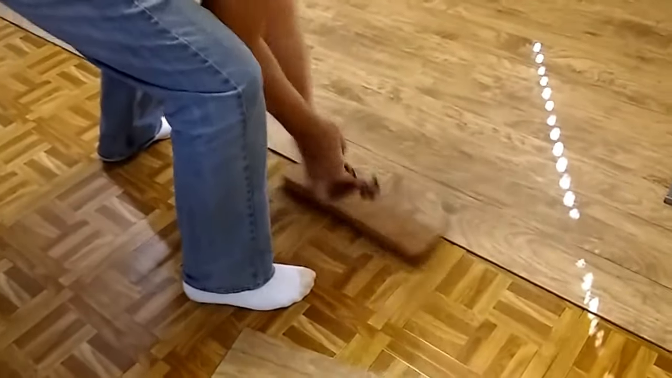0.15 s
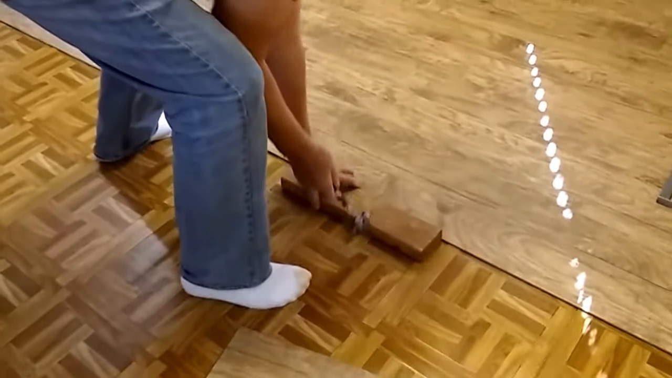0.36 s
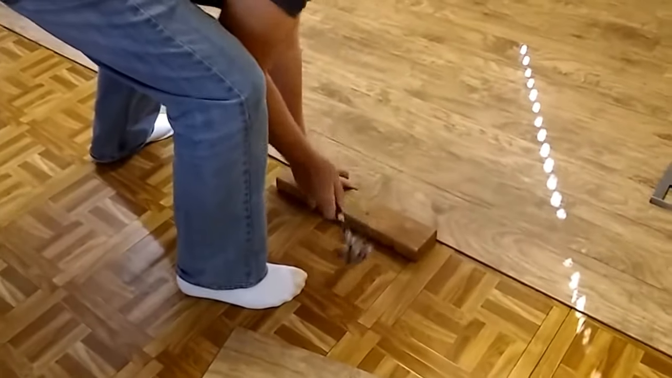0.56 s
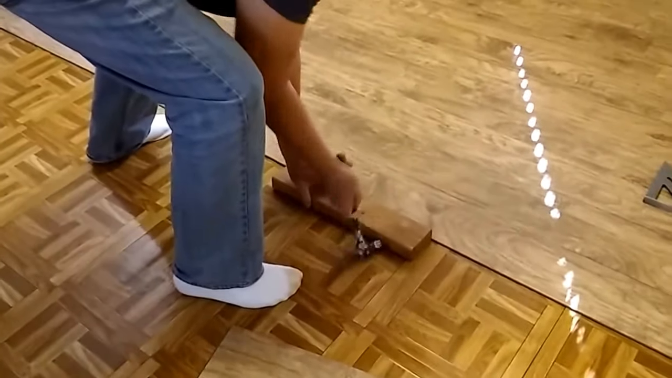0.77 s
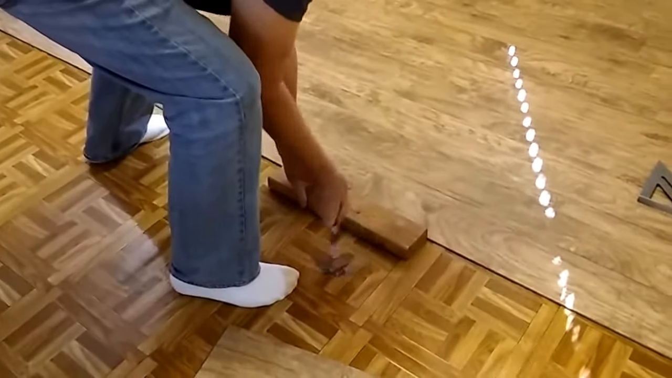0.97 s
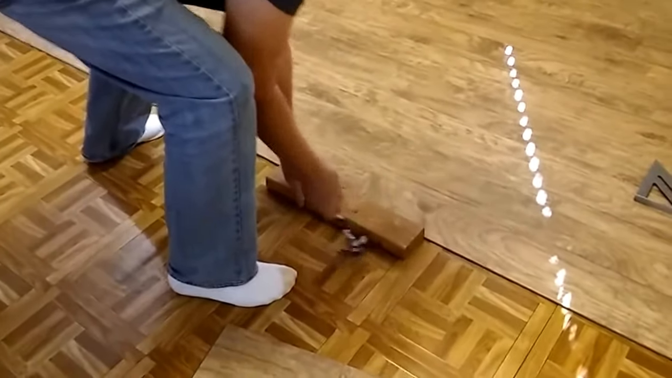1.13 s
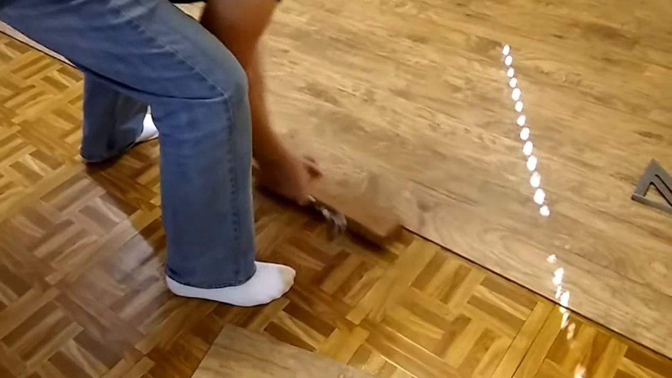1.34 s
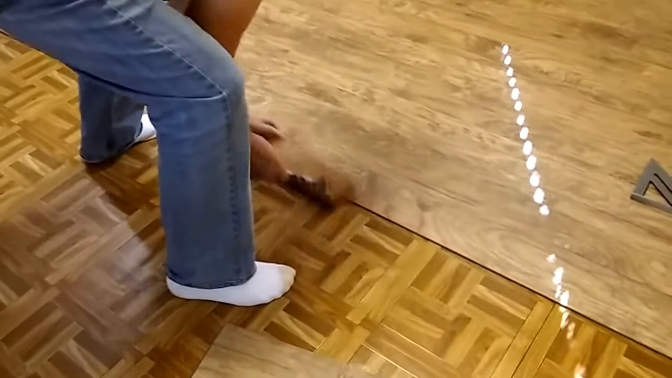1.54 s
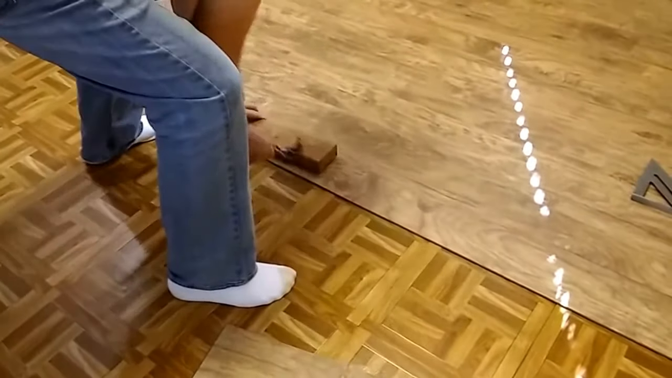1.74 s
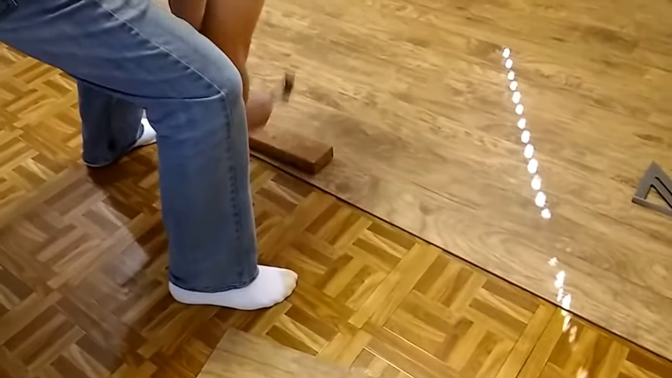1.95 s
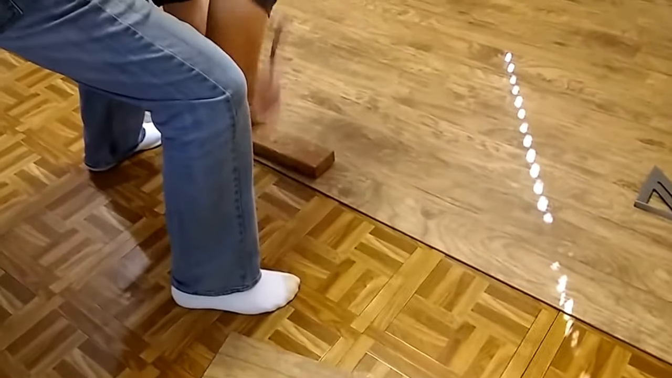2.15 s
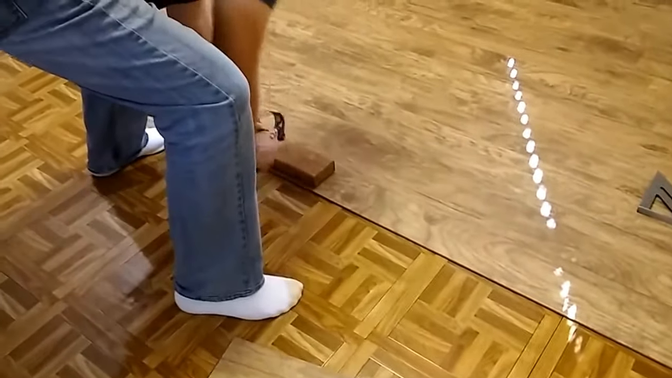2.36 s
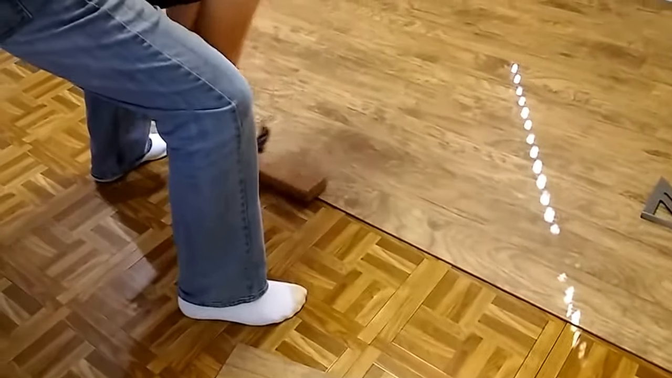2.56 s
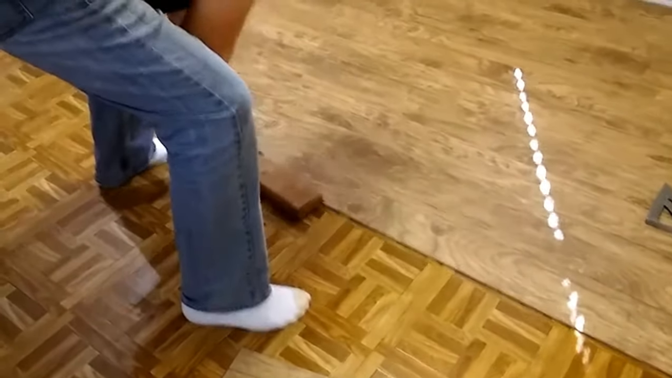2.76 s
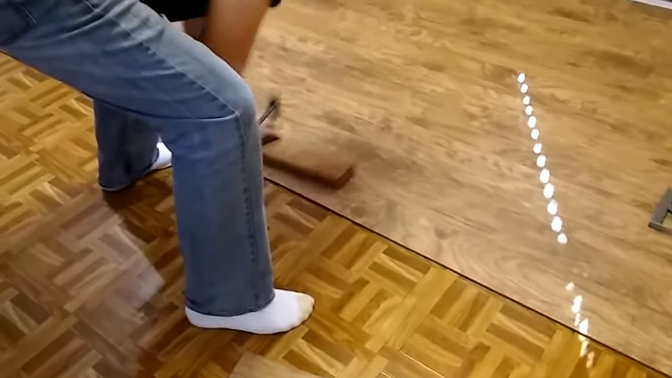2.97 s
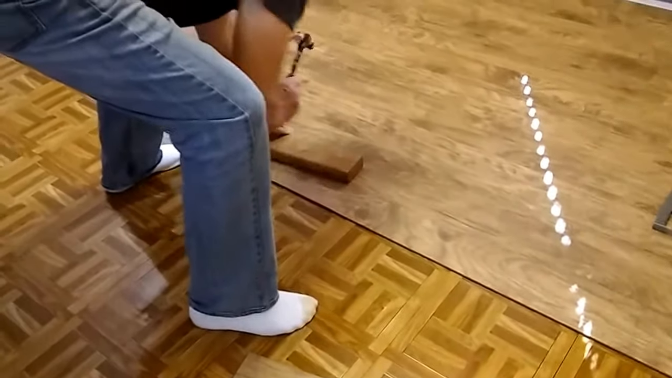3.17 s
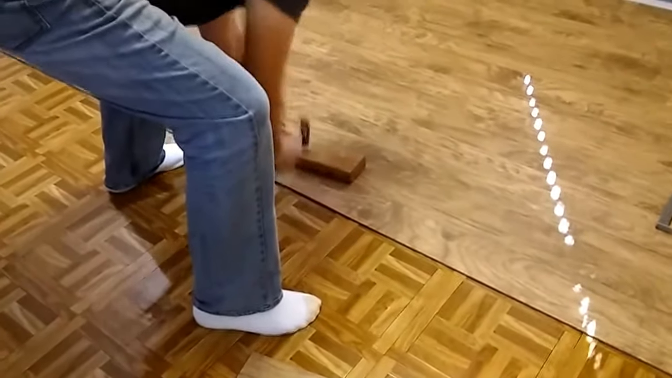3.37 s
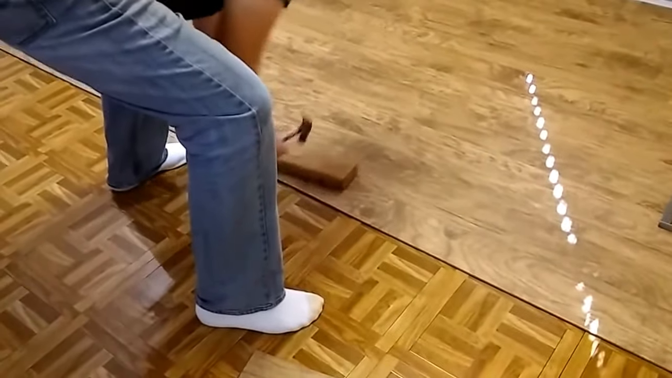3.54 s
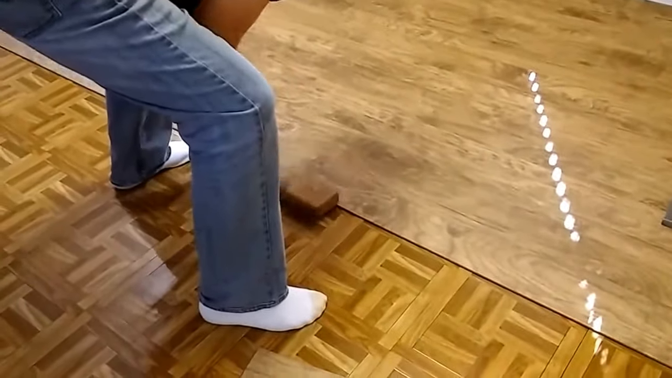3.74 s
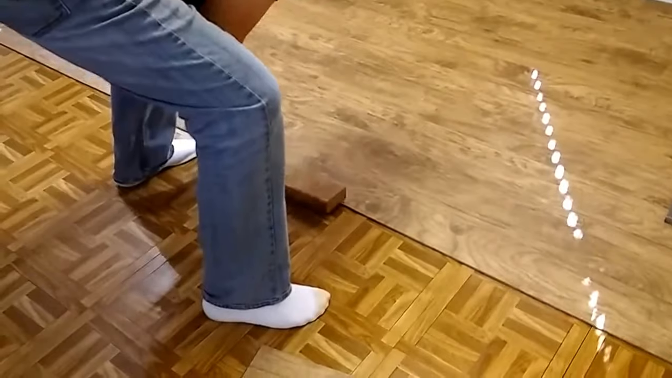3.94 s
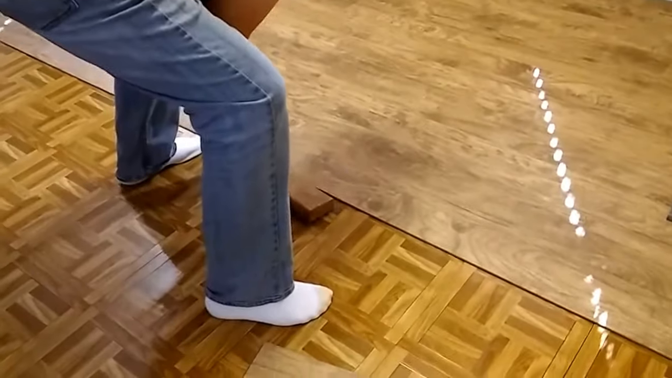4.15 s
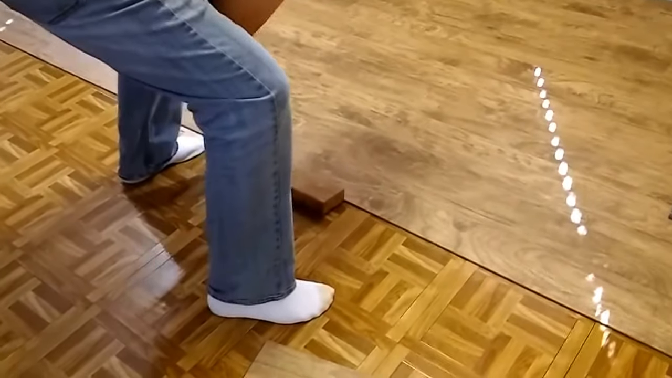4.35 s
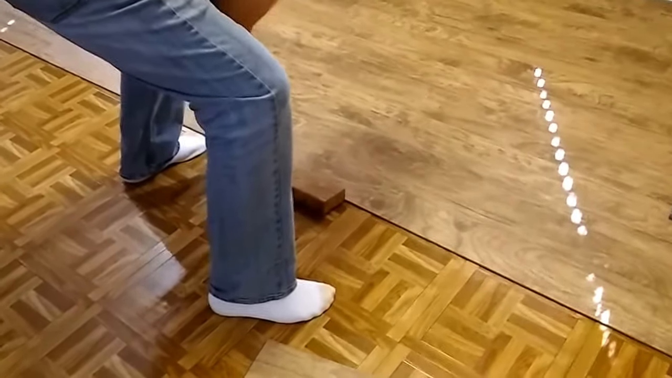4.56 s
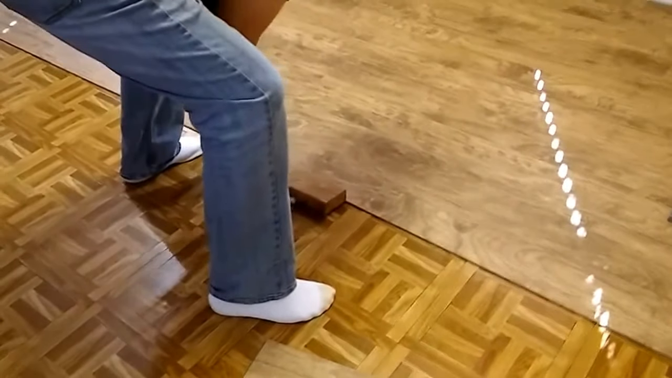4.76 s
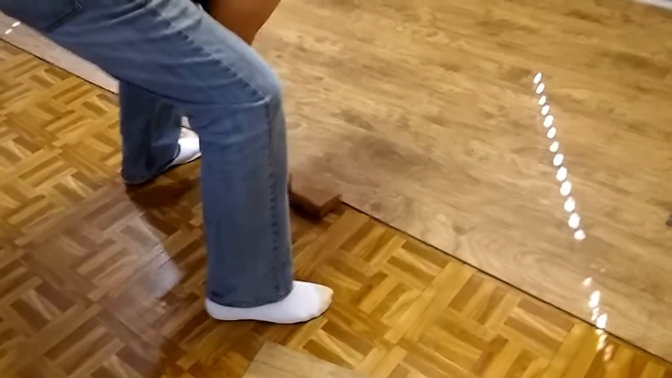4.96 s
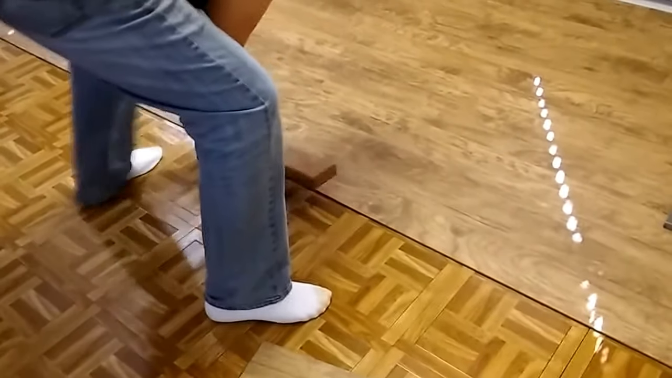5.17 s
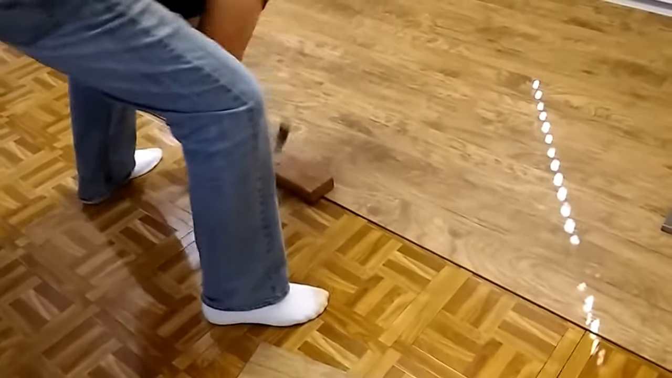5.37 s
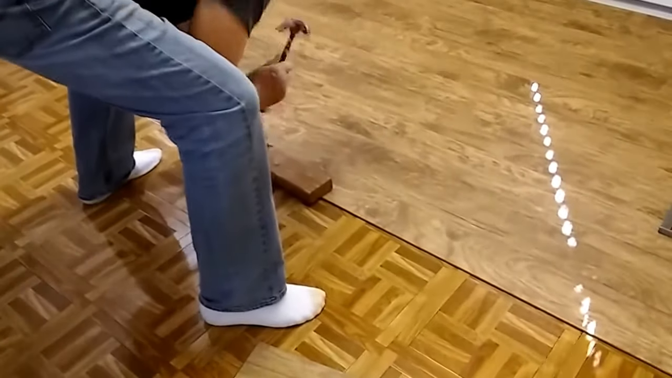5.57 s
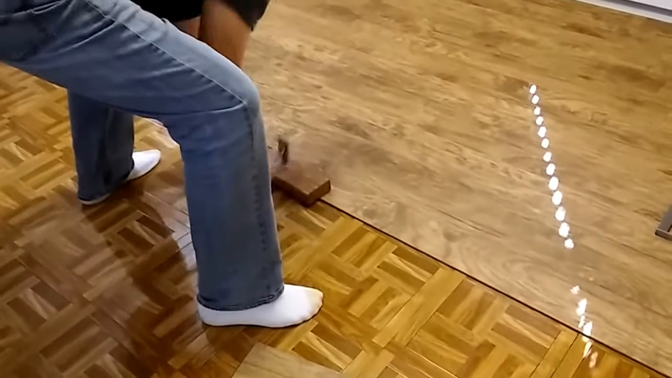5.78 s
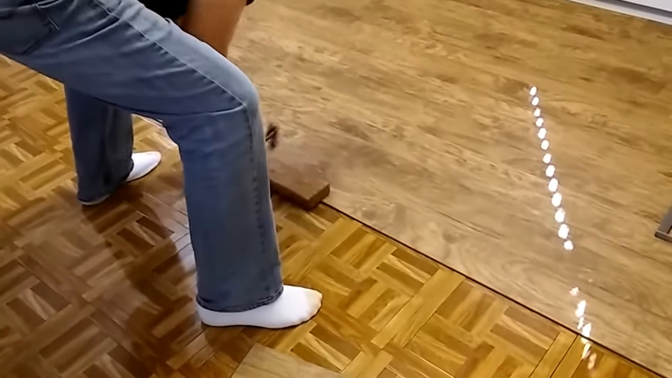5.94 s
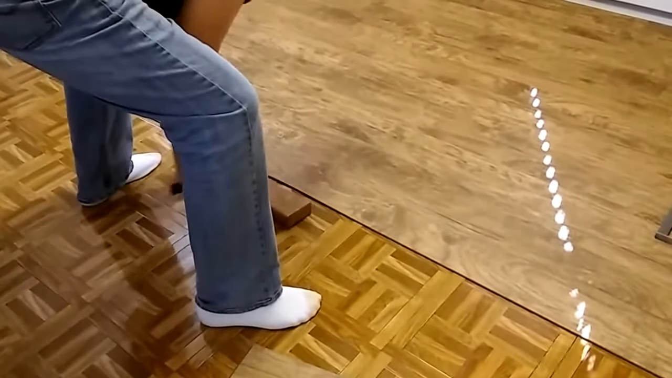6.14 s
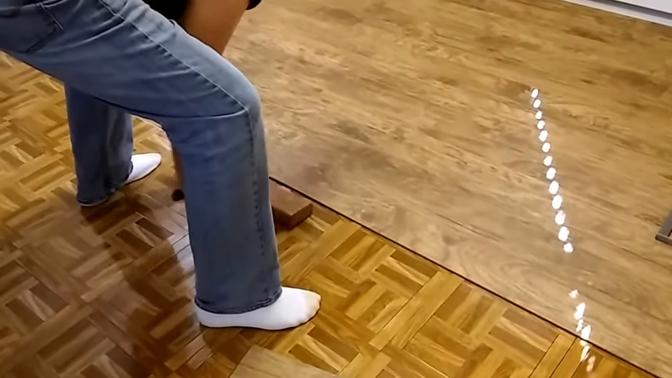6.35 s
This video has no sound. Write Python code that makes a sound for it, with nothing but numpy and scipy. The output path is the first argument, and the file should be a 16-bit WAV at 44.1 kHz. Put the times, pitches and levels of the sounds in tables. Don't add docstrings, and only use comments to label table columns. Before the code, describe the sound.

Two quick wooden taps, then widely spaced heavy hammer blows on a block, ringing hard in an empty room, with faint scuffs and clicks between.

```python
import sys
import numpy as np
from scipy import signal
from scipy.fft import rfft, irfft
from scipy.io import wavfile
from scipy.ndimage import uniform_filter1d

SR = 44100
rng = np.random.default_rng(int(sys.argv[2]) if len(sys.argv) > 2 else 0)


def to_wav(s):
    ch = np.atleast_2d(s).T
    pcm = np.round(np.clip(ch, -1, 1) * 32767)
    wavfile.write(sys.argv[1], SR, pcm.astype(np.int16))


def magnitude_from_level(level_db):
    exponent = np.asarray(level_db, float) / 20
    return 10 ** exponent


N = 282681
FRAME = 8192
PLACE_S = 1.1

# start_s, knock_db, thud_db, thud_tilt_db [dB per octave]
TAPS = [
    (0.771, -0.5, -13.5, 6.5),
    (1.051, -2, -8.5, -19),
]
# start_s, knock_db, thud_db, slap_s, landing_s
HEAVY = [
    (2.222, 4, -4, 2.224, 2.332),
    (3.318, 3, -0.5, 3.313, 3.425),
    (5.707, 7.5, 2.5, 5.717, 5.745),
]
# start_s, knock_db, thud_db, thud_tilt_db [dB per octave]
GLANCING = [
    (4.686, 0.0012, -4.5, -5),
]


def strikes():
    # frequency_hz, level_db [dB per Hz]
    tap_wood = [(180, -36), (300, 2.5), (336, -10.5), (482, 4.5), (606, 2), (801, 3), (1130, 1), (1570, -8),
                (2440, -7), (2820, -12), (3270, -12), (4930, -26.5), (8600, -50), (15000, -64.5)]
    heavy_wood = [(180, -35), (300, -2), (403, -4), (568, -3.5), (928, -10.5), (1080, -4), (1350, -9.5),
                  (1700, -7), (2070, -12.5), (2280, -7), (2650, -15.5), (2920, -12.5), (4390, -21.5),
                  (15000, -62)]
    glancing_wood = [(150, -13), (300, 1), (365, -0.5), (403, -2), (616, -7.5), (726, -8.5), (1470, -13),
                     (1590, -13.5), (2360, -11.5), (2780, -21.5), (3330, -11), (3670, -23.5), (4690, -21.5),
                     (7300, -42.5), (15000, -72)]
    knock_wood = [(200, -23.5), (500, 12.5), (1100, 1), (1700, -0.5), (2400, -7.5), (3250, -9.5),
                  (4500, -19.5), (6500, -29), (9000, -47.5), (15000, -43)]
    # start_s, knock_db, thud_db, thud_tilt_db [dB per octave]
    touches = [
        (1.46, -49, -39, -29),
        (1.633, -34.5, -22, -4.5),
        (1.681, -42, -41, 1.5),
        (3.619, -38, -31.5, -4),
        (3.718, -43, -37, -14),
        (4.017, -41.5, -25, -18),
        (4.044, -31, -21.5, 7.5),
        (4.066, -50.5, -28, -6.5),
        (4.432, -58, -43, -2.5),
        (6.205, -35.5, -24.5, 7),
    ]
    settles = [(0.004, -48.5, -31, -36), (0.094, -60, -37, -5), (0.196, -24, -23, -3.5),
               (0.268, -40.5, -42, -7), (1.549, -63.5, -40.5, 3), (2.866, -43.5, -42.5, 5.5),
               (2.962, -43, -38.5, -5.5), (4.148, -38, -29.5, -3), (4.396, -65, -50, -3),
               (5.263, -26, -22.5, -4), (5.29, -18, -12.5, 2), (5.649, -45, -40, -6), (6.061, -37, -19, 6)]
    scuffs = [
        (0.116, -42.5, -23, -34),
        (0.141, -40, -21.5, -10.5),
        (3.875, -49, -26.5, 7),
        (4.222, -45.5, -29, -8),
        (4.258, -32.5, -16.5, 11),
        (4.997, -44.5, -44.5, -4),
        (4.49, -64.5, -45.5, -11.5),
    ]
    flops = [
        (0.221, -24, -14, -6),
        (4.281, -31, -18.5, 0.5),
    ]

    blows = [(s, db, thud_db, 2.5) for s, db, thud_db, _, _ in HEAVY]
    slaps = [(s, db - 13, -18.5, 0) for _, db, _, s, _ in HEAVY]
    landings = [(s, db - 10, -18.5, 0) for _, db, _, _, s in HEAVY]
    # rows, wood, knock tilt [dB per octave], contact time [ms]
    kinds = [(TAPS, tap_wood, 2.21, 2.1), (blows, heavy_wood, 0.19, 4.8),
             (slaps, heavy_wood, 1.7, 4), (landings, heavy_wood, -0.36, 8.5),
             (GLANCING, glancing_wood, 0.68, 3.3), (touches, knock_wood, -0.5, 11),
             (settles, knock_wood, 0.25, 10), (scuffs, knock_wood, 4.5, 30), (flops, knock_wood, -14, 21)]
    low_cut = signal.butter(2, 115, "high", fs=SR, output="sos")
    for rows, wood, tilt_db, contact_ms in kinds:
        for s, knock_db, thud_db, thud_tilt_db in rows:
            knock, thud = strike(wood, knock_db, thud_db, tilt_db, thud_tilt_db, contact_ms)
            yield s, knock, 0, -np.inf
            yield s, signal.sosfilt(low_cut, thud), 6.5, -6.5


def strike(wood, knock_db, thud_db, tilt_db, thud_tilt_db, contact_ms):
    contacts = chatter(contact_ms)
    knock = magnitude_from_level(knock_db + 25) * signal.fftconvolve(contacts, pulse(wood, tilt_db))
    force = contacts.copy()
    force[0] += 0.8
    thud = magnitude_from_level(thud_db + 15.5) * signal.fftconvolve(force, board_modes(thud_tilt_db))
    return knock, thud


def chatter(contact_ms):
    fade = np.exp(-np.arange(FRAME) / SR / (contact_ms / 1000 + 1e-4))
    hits = rng.random(FRAME) < 2500 / SR
    x = rng.standard_normal(FRAME) * hits * fade
    x[0] = 0.8
    for _ in range(3):
        x = irfft(np.exp(1j * np.angle(rfft(x)))) * fade ** 0.35
    return x[:FRAME // 2] / np.linalg.norm(x)


def pulse(colour, tilt_db):
    hz = abs(np.fft.fftfreq(FRAME, 1 / SR))
    level_db = read(colour, hz) + tilt_db * np.log2(np.clip(hz, 300, 6000) / 1500)
    log_gain = np.log(magnitude_from_level(np.maximum(level_db, -90)))
    out = np.fft.ifft(np.exp(np.conj(signal.hilbert(log_gain)))).real[:FRAME // 2]
    out = signal.sosfilt(signal.butter(3, 125, "high", fs=SR, output="sos"), out)
    return out / np.linalg.norm(out)


def board_modes(tilt_db):
    # frequency_hz, level_db, t60_s
    boards = [(152.4, -4, 0.17), (191, 9, 0.055), (258.8, 0.5, 0.09), (313.5, -1.5, 0.1),
              (394, -8.5, 0.082), (546.3, -13.5, 0.039), (770, -29.5, 0.0052)]
    t = np.arange(FRAME) / SR
    hz, db, t60 = np.transpose(boards)[:, :, None]
    db = db + tilt_db * np.log2(hz / 250)
    out = (magnitude_from_level(db - 60 * t / t60) * np.sin(2 * np.pi * hz * t)).sum(axis=0)
    return out / np.linalg.norm(out)


def cracks():
    for s, db, *_ in TAPS + HEAVY + GLANCING:
        for delay_s, echo_db in (0, 0), (0.011, -8.5):
            yield s + delay_s, tick(db - 27.5 + echo_db, 10500), -8, 0


def ticks():
    # start_s, level_db
    tick_times = [(0.097, -45), (0.197, -34), (0.2054, -48), (1.462, -41.5), (1.493, -49.5), (1.6317, -36),
                  (1.8028, -48.5), (1.8253, -42), (1.844, -53), (4.0177, -44), (4.0437, -33.5),
                  (4.052, -46), (4.1482, -39.5), (4.2626, -35), (4.3959, -45.5), (4.4323, -45.5),
                  (4.5885, -58), (5.2626, -45), (5.2926, -18.5), (6.0601, -27.5)]
    for s, db in tick_times:
        yield s, tick(db, 4000), 2.5, 0


def tick(db, hz):
    colour = [(hz / 5, -20), (hz / 2.2, -2), (hz * 1.2, -2), (hz * 1.9, -26), (SR, -60)]
    return magnitude_from_level(db + 11.5) * signal.fftconvolve(chatter(1), pulse(colour, 0))


def pings():
    # start_s, pitch_hz, level_db, t60_s
    ping_rows = [(0.14, 1770, -40.5, 0.03), (.198, 3480, -41, 0.022), (.223, 651, -20.5, 0.019),
                 (.224, 392, -24.5, 0.021), (1.586, 2550, -51, 0.035), (1.585, 4280, -56.5, 0.035),
                 (1.684, 2500, -47.5, 0.03), (2.85, 2530, -55, 0.03), (2.909, 4000, -51, 0.046),
                 (4.017, 1690, -42.5, 0.023), (4.044, 3190, -40, 0.021), (4.045, 1534, -38, 0.029),
                 (4.263, 1120, -28.5, 0.02), (5.294, 2430, -27, 0.043), (4.686, 3280, -20.5, 0.043),
                 (4.686, 2360, -17.5, 0.033), (3.385, 1120, -20, 0.062), (5.745, 1613, -18.5, 0.048),
                 (2.285, 1222, -15, 0.1)]
    for s, hz, db, t60 in ping_rows:
        yield s, ping(hz, db, t60), -0.5, -5


def ping(hz, db, t60):
    t = np.arange(FRAME) / SR
    close_hz = hz * (1 + 0.02 * rng.uniform(-1, 1, (3, 1)))
    modes = np.sin(2 * np.pi * close_hz * t).sum(axis=0)
    return magnitude_from_level(db - 60 * t / t60) * modes * (1 - np.exp(-t / 0.0015))


def slides():
    # fastest_s, level_db, rise_db_per_s, fall_db_per_s
    slide_rows = [
        (1.655, -46, 100.5, 111.5),
        (2.925, -46, 404, 56.5),
    ]
    # frequency_hz, level_db [dB per Hz]
    slide_colour = [(150, -9.5), (300, 7), (1000, 5.5), (2500, 4), (4200, -0.5), (7000, -15.5),
                    (10000, -28), (15000, -38.5)]
    out, fade_db = np.zeros(N), 18
    for s, db, rise, fall in slide_rows:
        t = np.arange(s - fade_db / rise, s + fade_db / fall, 1 / SR)
        grains = magnitude_from_level(2.5 * evened(uniform_filter1d(rng.standard_normal(N), size=200)))
        sound = evened(grains * coloured(slide_colour, N))[:len(t)]
        level = magnitude_from_level(swell_db(t, s, db, rise, fall))
        add(out, t[0], level * sound * signal.windows.tukey(len(t), 0.2))
    return out


def bumps():
    # start_s, level_db, after_swing_ms
    bump_rows = [
        (1.802, -16.5, 10),
        (1.804, -23, 37),
        (1.821, -22.5, 8),
        (1.825, -22.5, 16),
        (1.841, -32, 8.6),
        (1.846, -29.5, 19),
        (2.185, -36.5, 9.8),
        (2.496, -15.5, 19),
        (3.015, -18, 21),
        (3.157, -14, 20),
    ]
    # start_s, level_db, after_swing_ms
    rub_rows = [
        (2.766, -28.5, 13),
        (2.782, -29, 15),
        (2.795, -32, 15),
    ]
    out, t = np.zeros(N), np.arange(2500) / SR
    for rows, hz in (bump_rows, 330), (rub_rows, 172):
        cycles = hz * 0.0038 * np.log(1 + t / 0.0022)
        push = t * hz / 0.26
        for s, db, after_ms in rows:
            after = 0.2 * np.exp(-1000 * t / after_ms)
            envelope = push * np.exp(1 - push) + after
            add(out, s, -magnitude_from_level(db - 2.5) * np.sin(2 * np.pi * cycles) * envelope)
    return out


def hum():
    # peak_s, level_db, rise_db_per_s, fall_db_per_s
    cycles = [
        (.08, -60, 7, 85),
        (1.64, -51, 90.5, 299),
        (2.93, -60, 61, 70),
        (3.6, -43.5, 82, 68),
        (4.1, -53.5, 27.5, 60),
        (4.9, -71, 12, 6.5),
        (6.1, -55, 34, 35),
    ]
    t, hz, width_hz = np.arange(N) / SR, 1075, 25
    slow = signal.lfilter([1], [1, -np.exp(-np.pi * width_hz / SR)], rng.standard_normal((2, N)))
    level = magnitude_from_level(np.max([swell_db(t, *row) for row in cycles], axis=0))
    return level * evened(slow[0] * np.cos(2 * np.pi * hz * t) + slow[1] * np.sin(2 * np.pi * hz * t))


def air():
    # frequency_hz, level_db [dB per Hz]
    air_colour = [(15, -24.5), (30, 2.5), (60, 24.5), (90, 7), (130, 11), (310, 8.5), (600, -0.5),
                  (1000, -5.5), (2000, -10.5), (4000, -14), (6000, -17.5), (8400, -31), (12500, -26),
                  (16000, -34)]
    # pitch_hz, level_db [rms]
    whine_tones = [(1121, -66.5)]
    swell = magnitude_from_level(1.1 * evened(uniform_filter1d(rng.standard_normal(N), size=4000)))
    t = np.arange(N) / SR
    whine = sum(magnitude_from_level(db) * np.sqrt(2) * np.sin(2 * np.pi * hz * t) for hz, db in whine_tones)
    return magnitude_from_level(-56.5) * coloured(air_colour, N) * swell + whine * swell[::-1] ** 0.51


def echoes():
    # frequency_hz, t60_s
    room_decay = [(60, 0.19), (200, 0.34), (500, 0.45), (1200, 0.57), (2500, 0.62), (4000, 0.58),
                  (6000, 0.54), (9000, 0.45), (15000, 0.4)]
    taps = np.zeros(SR + SR // 2)
    at = np.arange(40, len(taps) - 20, 20)
    taps[at + rng.integers(0, 20, len(at))] = rng.choice([-1., 1.], len(at))
    hz, t, z = signal.stft(taps, SR, nperseg=256)
    decay = magnitude_from_level(-60 * t / read(room_decay, hz)[:, None])
    tail = signal.istft(z * decay, SR, nperseg=256)[1][:len(taps)]
    tail *= 1 + 0.82 * np.exp(-np.arange(len(tail)) / SR / 0.005)
    tail /= np.linalg.norm(tail)
    tail[0] = magnitude_from_level(-11)
    return tail


def evened(x):
    return x / np.sqrt(np.mean(x ** 2) + 1e-20)


def read(points, hz):
    f, value = np.transpose(points)
    return np.interp(np.log(hz + 1), np.log(f + 1), value)


def coloured(points, size):
    gain = magnitude_from_level(read(points, np.fft.rfftfreq(size, 1 / SR)))
    return evened(irfft(rfft(rng.standard_normal(size)) * gain, size))


def swell_db(t, s, db, rise, fall):
    return db - np.maximum(rise * (s - t), fall * (t - s))


def add(mix, s, sound):
    part = mix[round(s * SR):][:len(sound)]
    part += sound[:len(part)]


def scene():
    places = np.zeros((int(N / SR / PLACE_S) + 1, N))
    direct = np.zeros(N)
    for source in strikes(), pings(), ticks(), cracks():
        for s, sound, room_db, direct_db in source:
            add(places[int(s / PLACE_S)], s, magnitude_from_level(room_db) * sound)
            add(direct, s, magnitude_from_level(direct_db) * sound)
    grit = slides()
    wet = sum(signal.fftconvolve(x, echoes())[:N] for x in places)
    wet += magnitude_from_level(-2.5) * grit + magnitude_from_level(-5) * signal.fftconvolve(grit, echoes())[:N]
    return (wet + direct + bumps() + air() + hum())[None]


def roll_off(x):
    return signal.sosfilt(signal.butter(12, 16550, fs=SR, output="sos"), x)


def record(dry):
    x = signal.sosfilt(signal.butter(2, 90, "high", fs=SR, output="sos"), dry)
    peak_db = 20 * np.log10(abs(x[0]) + 1e-9)
    fall = np.arange(N) * 89.0 / SR
    held_db = np.maximum.accumulate(peak_db + fall) - fall
    over_db = np.maximum(held_db - 4.2, 0)
    x = x / magnitude_from_level(0.9 * signal.lfilter([0.25], [1, -0.75], over_db))
    x = np.clip(x, -0.95, 0.95)
    x = signal.oaconvolve(x, signal.firwin(255, 16300, fs=SR)[None], "same")
    return roll_off(x)


dry = scene()
out = record(dry)
to_wav(out)
```